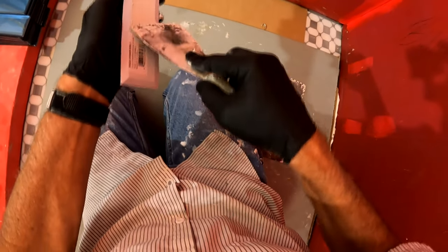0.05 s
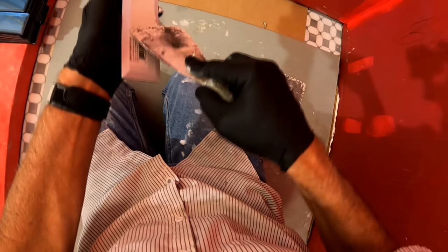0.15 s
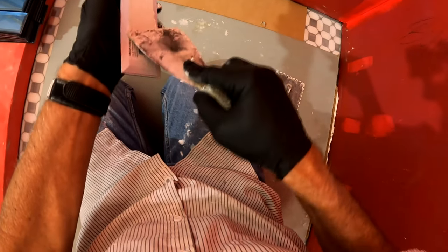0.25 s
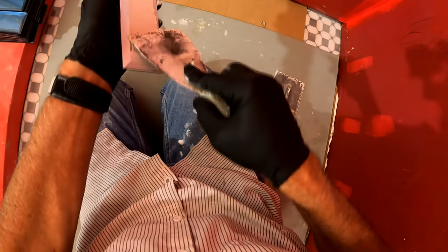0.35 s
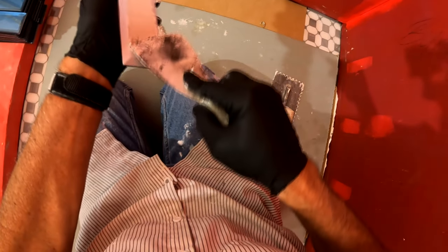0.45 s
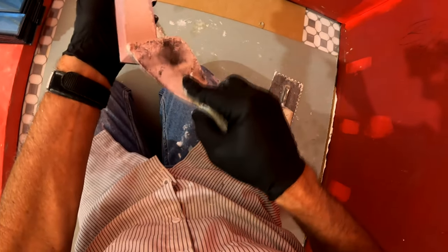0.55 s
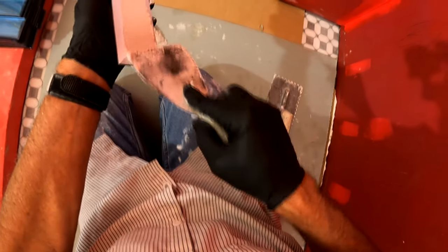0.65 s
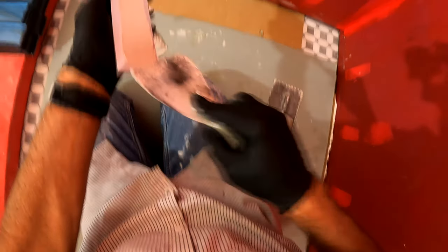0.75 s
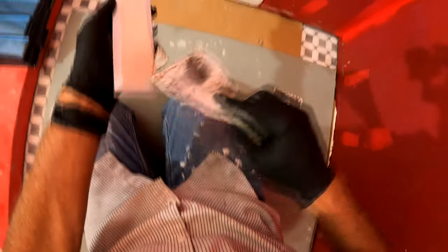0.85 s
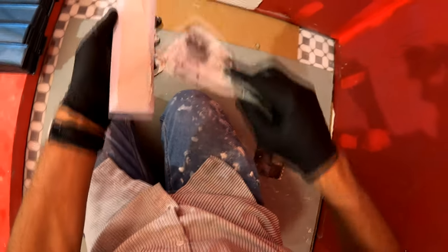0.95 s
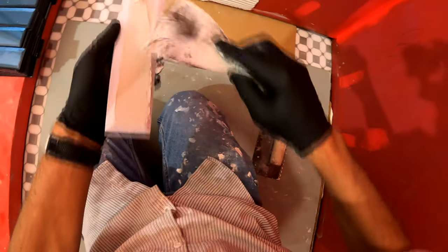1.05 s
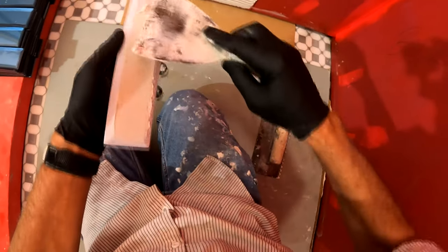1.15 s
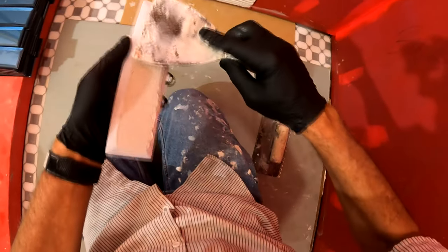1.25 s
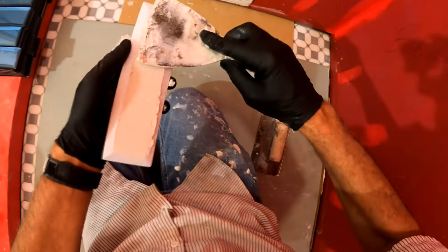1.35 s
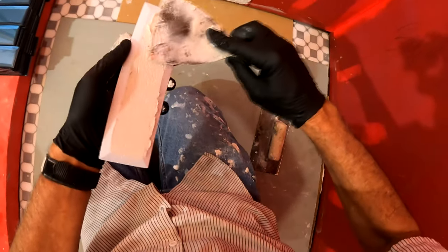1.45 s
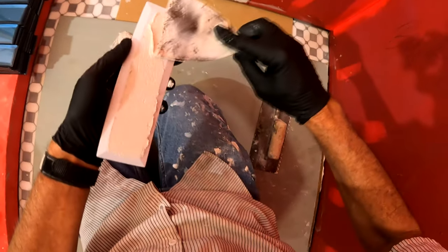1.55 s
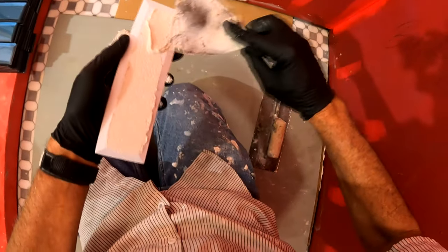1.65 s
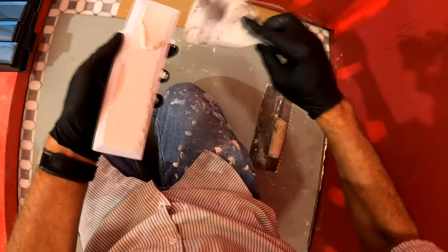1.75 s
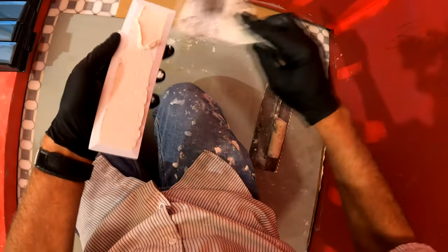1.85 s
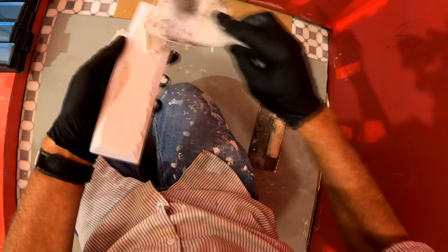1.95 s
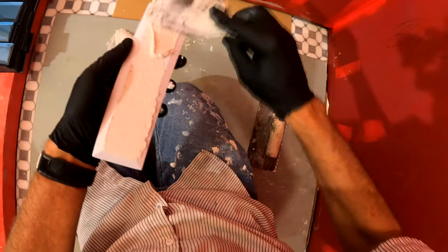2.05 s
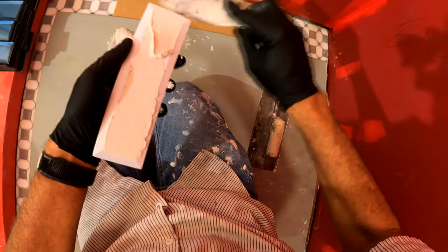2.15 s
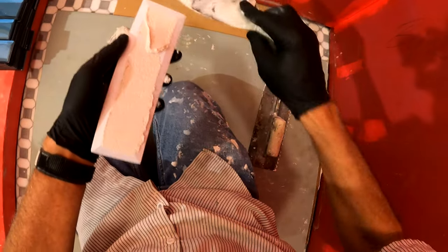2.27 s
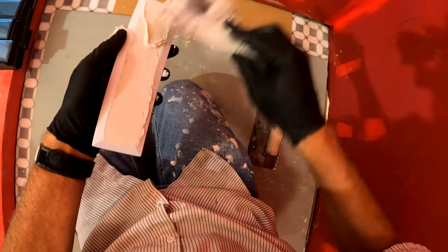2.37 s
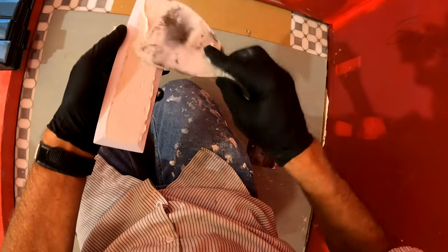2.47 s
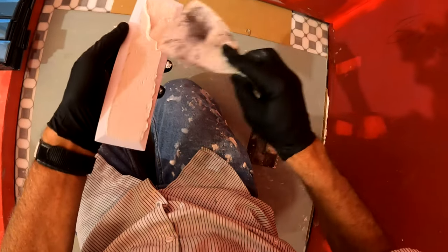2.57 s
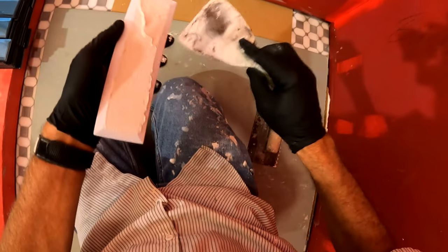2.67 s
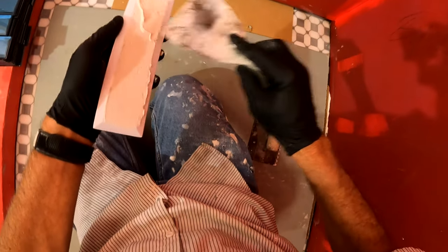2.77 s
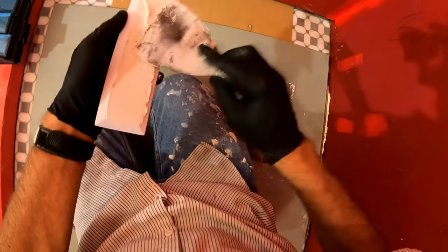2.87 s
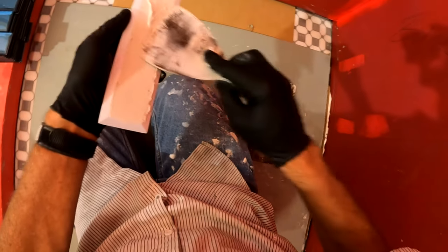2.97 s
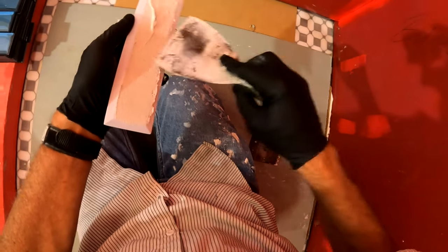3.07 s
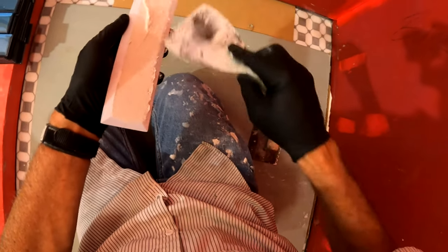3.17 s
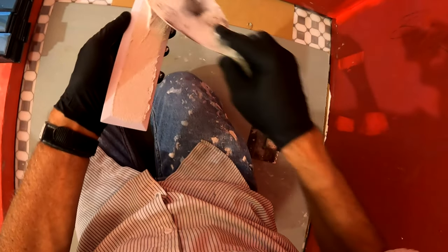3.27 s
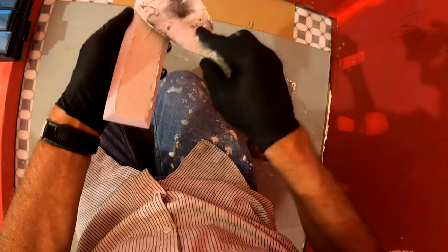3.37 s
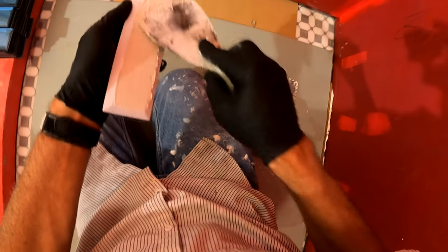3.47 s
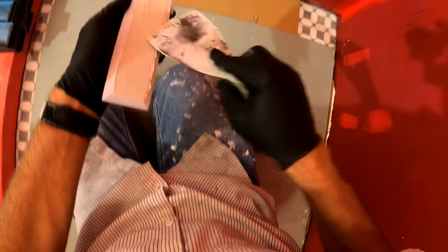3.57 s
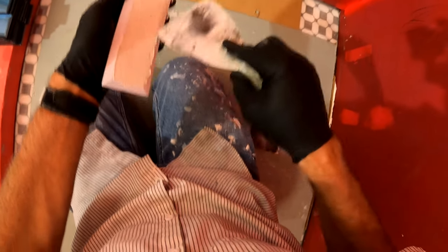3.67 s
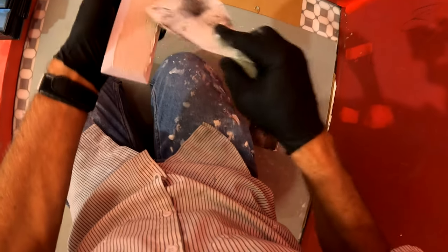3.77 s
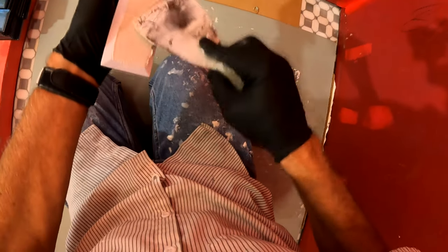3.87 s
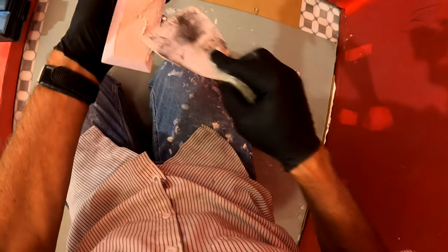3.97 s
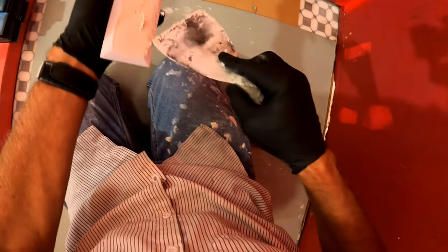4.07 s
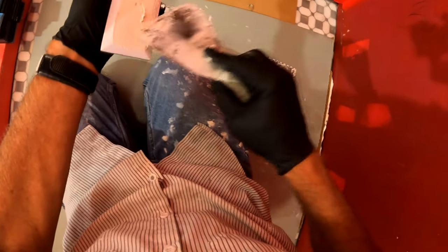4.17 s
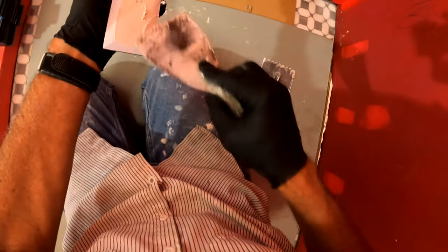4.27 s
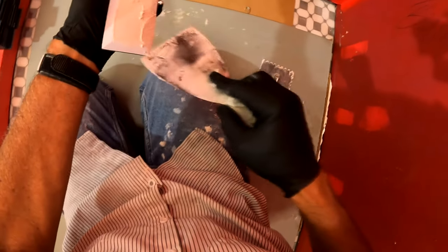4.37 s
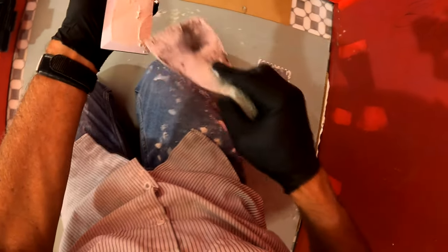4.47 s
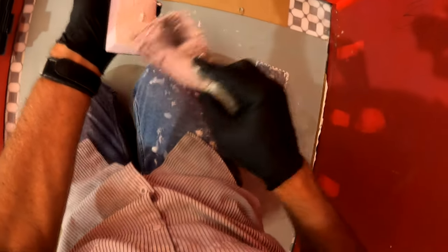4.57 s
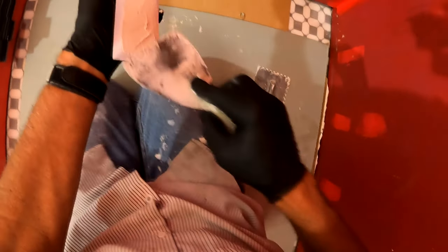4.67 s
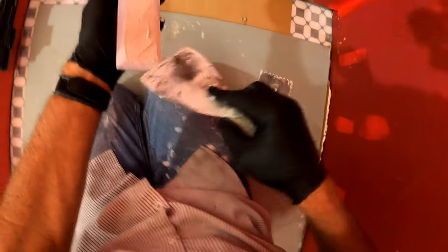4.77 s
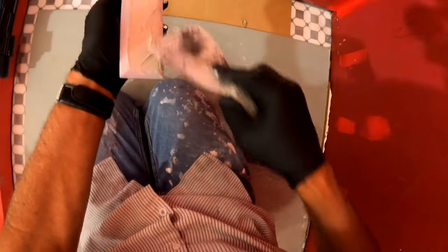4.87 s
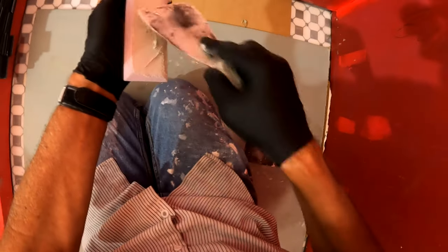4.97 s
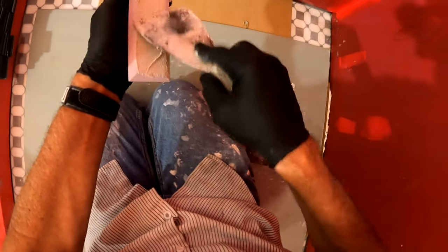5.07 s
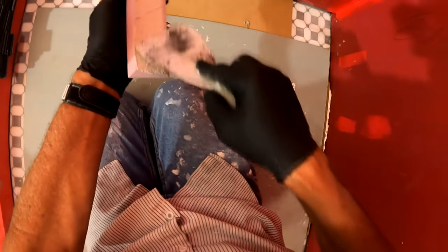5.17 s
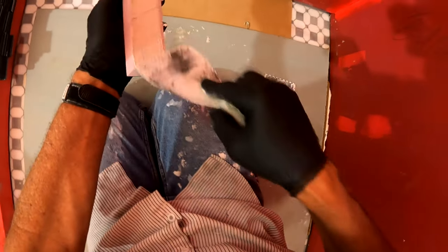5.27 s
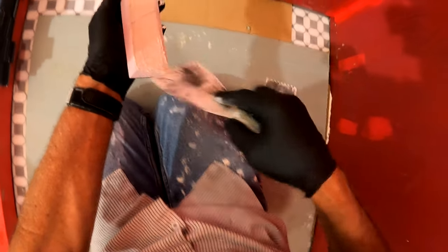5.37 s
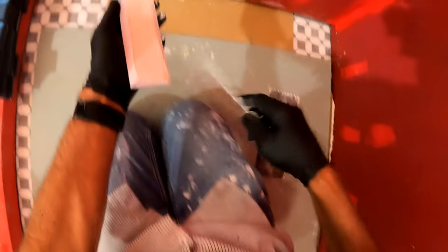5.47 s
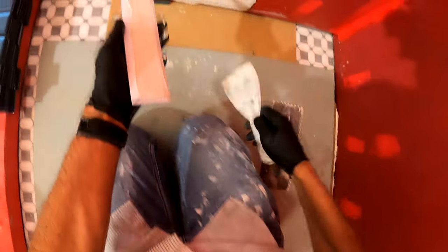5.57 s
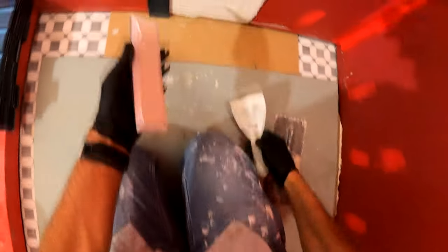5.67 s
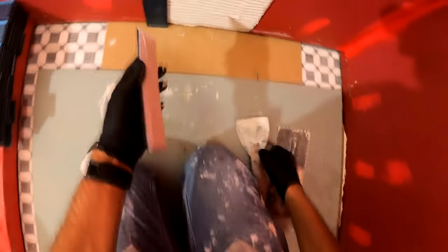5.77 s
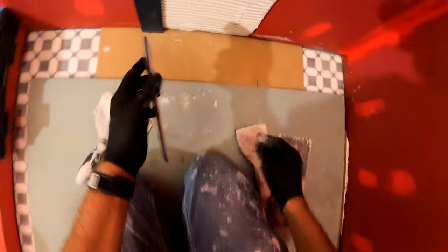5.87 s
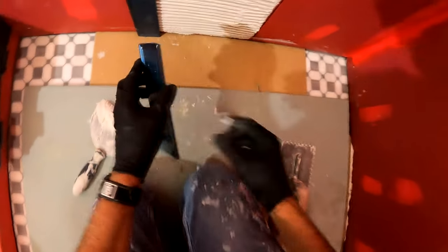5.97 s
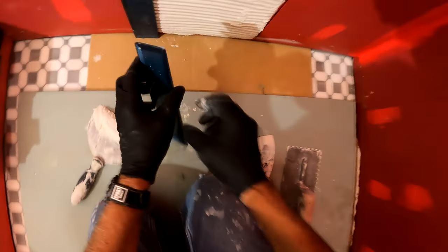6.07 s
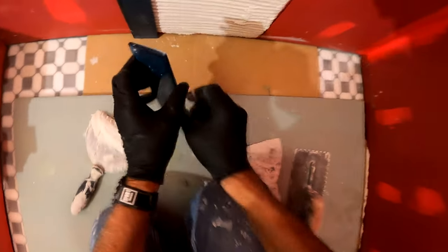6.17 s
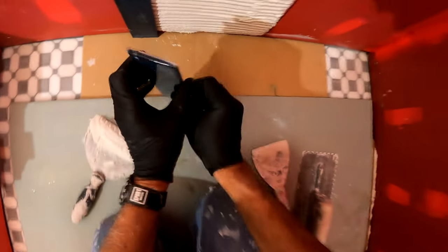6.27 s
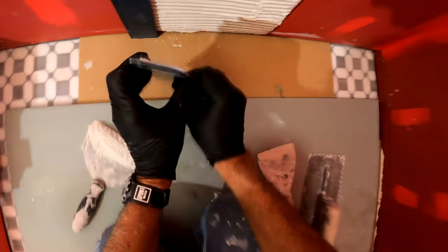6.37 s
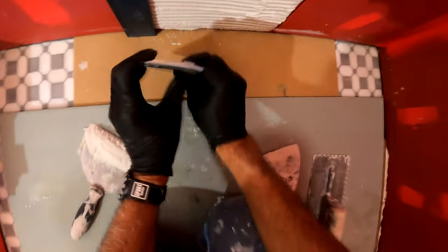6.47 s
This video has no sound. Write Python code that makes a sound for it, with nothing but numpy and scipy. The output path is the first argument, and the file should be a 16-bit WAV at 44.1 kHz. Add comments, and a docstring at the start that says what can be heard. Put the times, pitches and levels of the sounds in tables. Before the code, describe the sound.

A close, dry-gritty perspective inside a small hard-walled shower stall, with short sparse echoes, faint room air and low rumble swelling as the body moves. From 0 to 0.9 s a steel putty knife makes three overlapping crunchy scrapes through sandy mortar, dotted with bright ringing stone clicks. Gloves and sleeves rustle softly around 0.9-1.3 s; a blade tap and dull bump land at 1.35. Short separate scrapes follow at about 1.5, 1.75, 2.2, 2.65 and 3.1, with a firm low tile bump near 2.95. A double tap at 3.43 leads into brief strokes to 3.75, then scrapes at 4.0, 4.3-4.5 and 4.75, another thump at 4.83, and a last grating stroke at 5.1-5.4. Rustling rises at 5.4-5.85. At 5.85 the dropped knife hits with a very loud hard knock, rattling and clinking until 6.05. Faint rustles finish around 6.3-6.55.

```python
"""A steel putty knife works gritty mortar onto the back of a small tile in a hard-walled shower stall.
Quick scrapes open the scene: crunching noise rings the modes of blade and tile, and stones catch the edge.
Then come spaced strokes, blade taps, dull bumps (decaying sines) and rustling gloves and sleeves (shaped noise).
Near the end the dropped knife bounces: floor modes thud and the steel clinks; a few last rustles follow.
Room tone (shaped noise with a swelling rumble) and the stall's sparse echoes lie under it all."""
import sys
import numpy as np
from scipy import signal
from scipy.fft import rfft, irfft, next_fast_len
from scipy.io import wavfile
from scipy.ndimage import uniform_filter1d

SR = 44100
rng = np.random.default_rng(int(sys.argv[2]) if len(sys.argv) > 2 else 0)


def to_wav(sig):
    """Store sig (one row per channel, or 1-D mono) as 16-bit WAV at the path in sys.argv[1].

    Samples outside -1..1 are clipped; the rate is SR.
    """
    pcm = np.clip(np.atleast_2d(sig), -1, 1) * 32767
    pcm = np.round(pcm).astype(np.int16)
    wavfile.write(sys.argv[1], SR, pcm.T)  # frames by channels


N = 287973


def gain_of(db):
    """Amplitude factor of a level in dB."""
    return 10 ** (np.asarray(db) / 20)


def evened(x):
    """Scales x to rms 1."""
    return x / np.sqrt(np.mean(x ** 2) + 1e-20)


def read(points, hz):
    """Reads a curve of (Hz, value) points, straight over log frequency."""
    f, value = np.transpose(points)
    return np.interp(np.log(hz + 1), np.log(f + 1), value)


def shaped(x, gain):
    """Weights each frequency of x by gain(hz)."""
    size = next_fast_len(x.shape[-1])
    spectrum = rfft(x, size) * gain(np.fft.rfftfreq(size, 1 / SR))
    return irfft(spectrum, size)[..., :x.shape[-1]]


def ring(x, hz, width_hz):
    """One fixed mode: a two-pole resonance that rings down after each push."""
    r, w = np.exp(-np.pi * width_hz / SR), 2 * np.pi * hz / SR
    return signal.lfilter([0, np.sin(w)], [1, -2 * r * np.cos(w), r * r], x)


def sweep(x, hz, width_hz):
    """A moving resonance of peak gain 1: x is shifted down by the curve hz, smoothed and shifted back."""
    turn = np.exp(2j * np.pi * np.cumsum(hz * np.ones(len(x))) / SR)
    r = np.exp(-np.pi * width_hz / SR)
    return 2 * (turn * signal.lfilter([1 - r], [1, -r], x / turn)).real


def wander(length, span):
    """Slow random curve of rms 1: noise smoothed twice over span samples."""
    once = uniform_filter1d(rng.standard_normal(length), size=span)
    return evened(uniform_filter1d(once, size=span))


def add(mix, start_s, sound):
    """Adds sound into mix, cut off at the end of mix."""
    part = mix[..., round(start_s * SR):][..., :sound.shape[-1]]
    part += sound[..., :part.shape[-1]]


# Stereo width of stall and air. Each row: frequency in Hz, gain of the opposed part from 0 to 1.
WIDTH_CURVE = [(100, 0.16), (300, 0.18), (600, 0.31), (1200, 0.52), (4000, 0.75), (13000, 0.6)]


def spread(mid, side):
    """Left and right from a shared part and an opposed part."""
    side = shaped(side, lambda hz: np.clip(read(WIDTH_CURVE, hz), 0, 1))
    return np.array([mid + side, mid - side])


RUMBLE_BED_DB = -64
# Body shifts that swell the rumble. Each row: peak time in s, peak gain added to the bed in dB,
# rise of 20 dB in s, fall of 20 dB in s.
BODY_SHIFTS = [(.3, -56, .4, .6), (1.23, -43.5, 0.25, 0.62), (2.18, -51, 0.092, .1),
               (2.54, -54.5, .3, 0.41), (3.01, -50.5, .1, .5), (3.83, -42, 0.14, 0.57),
               (4.9, -40.5, .2, 0.51), (5.88, -49, 0.17, 0.19)]


def swells():
    """Gain of the rumble: a constant bed plus one exponential rise and fall for each shift of the body."""
    t = np.arange(N) / SR
    gain = gain_of(RUMBLE_BED_DB)
    for peak_s, db, rise_s, fall_s in BODY_SHIFTS:
        gain = gain + gain_of(db - 20 * np.maximum((peak_s - t) / rise_s, (t - peak_s) / fall_s))
    return gain


AIR_DB = -53  # rms
# Spectrum of the air. Each row: frequency in Hz, relative level in dB.
AIR_CURVE = [(35, -44), (60, -22), (112, -11.5), (234, -8), (500, -14.5), (560, -24), (855, -27),
             (1080, -25), (1490, -24.5), (2800, -39.5), (5000, -38), (15000, -57)]
# Faint hum bands in the air. Each row: centre in Hz, width of each of two passes in Hz, rms level in dB.
HUM_BANDS = [(338, 37, -62.5), (469.8, 19, -63)]


def room_tone():
    """Steady broad noise, two faint narrow noise bands and a low rumble that follows the body."""
    air = shaped(rng.standard_normal((2, N)), lambda hz: gain_of(read(AIR_CURVE, hz)))
    rumble_curve = [(8, -27), (24, 1.0), (55, -10.5), (100, -14.5), (200, -61.5)]  # (Hz, dB)
    low = shaped(rng.standard_normal((2, N)), lambda hz: gain_of(read(rumble_curve, hz)))
    rumble = evened(low[0]) + 0.15 * evened(low[1]) * np.array([[1], [-1]])
    hum = np.zeros(N)
    for hz, width_hz, db in HUM_BANDS:
        band = sweep(sweep(rng.standard_normal(N), hz, width_hz), hz, width_hz)
        hum += gain_of(db) * evened(band)
    return gain_of(AIR_DB) * evened(spread(*air)) + hum + swells() * rumble


# Decay of the stall. Each row: frequency in Hz, t60 in s.
STALL_T60 = [(180, 0.2), (700, 0.41), (1840, 0.29), (4850, 0.31), (12000, 0.19)]
# Strength of the stall. Each row: frequency in Hz, relative level in dB.
STALL_LEVEL = [(100, -22.5), (500, 4.5), (2000, -3), (6000, -7), (13000, -3.5)]


def stall(x):
    """Close hard walls: sparse echoes of random sign, each band dying at its own speed."""
    echoes = np.zeros((2, SR))
    at = np.arange(100, SR - 20, 20) + rng.integers(0, 20, (2, (SR - 101) // 20))
    np.put_along_axis(echoes, at, rng.choice([-1., 1.], at.shape), 1)
    hz, t, bands = signal.stft(echoes, SR, nperseg=256)
    t60_s = read(STALL_T60, hz)[:, None]
    level_db = read(STALL_LEVEL, hz)[:, None] - 60 * t / t60_s
    bands = bands * gain_of(level_db) / np.sqrt(t60_s * 160)  # long bands start softer
    tail = signal.istft(bands, SR, nperseg=256)[1]
    tail[:, :100] = 0  # nothing returns before the nearest wall
    return spread(*signal.fftconvolve(x[None], tail, axes=1)[:, :N])


# Gloves, sleeves and wet mortar. Each row: start in s, length in s, level before the swell in dB.
RUSTLE_EVENTS = [(0.881, .2, -49.5), (1.076, .14, -51.5), (1.252, 0.13, -61.5), (2.079, 0.067, -56),
                 (2.537, 0.061, -58), (3.27, 0.19, -58.5), (5.381, 0.19, -54), (5.501, 0.14, -43),
                 (5.599, .17, -42.5), (5.757, 0.091, -47), (6.298, 0.094, -60.5), (6.42, .14, -54)]
# Spectrum of rubber and cloth. Each row: frequency in Hz, relative level in dB.
RUSTLE_CURVE = [(180, -41), (300, 0), (703, -15.5), (763, -8), (1080, -12.5), (1910, -7), (3220, -13.5),
                (4470, -8.5), (11700, -24.5), (15000, -41.5)]


def rustles():
    """Soft patchy noise of rubber and cloth; each rustle swells and fades."""
    out = np.zeros(N)
    for start_s, length_s, db in RUSTLE_EVENTS:
        t = np.arange(0, length_s, 1 / SR)
        flicker = evened(uniform_filter1d(rng.standard_normal(len(t)), size=300))
        patchy = rng.standard_normal(len(t)) * gain_of(1.3 * flicker)
        noise = shaped(patchy, lambda hz: gain_of(read(RUSTLE_CURVE, hz)))
        add(out, start_s, evened(noise) * gain_of(db) * np.sin(np.pi * t / length_s) ** 1.2)
    return out


# Tile against hand and knee. Each row: start in s, level before onset and decay in dB, pitch in Hz, t60 in s.
TILE_BUMPS = [(1.348, -30.5, 201, 0.053), (2.092, -44.5, 199, 0.18), (2.556, -31, 161, 0.031),
              (2.962, -21, 168, 0.029), (3.43, -33, 330, 0.09), (3.93, -34, 150, 0.052),
              (4.0, -29, 400, .08), (4.335, -30.5, 410, .06), (4.679, -35.5, 119, 0.055),
              (4.825, -18, 170, 0.034), (4.92, -37, 127, 0.12), (6.075, -33, 125, 0.2)]


def bumps():
    """Soft low knocks: damped sines with a rounded onset."""
    out, t = np.zeros(N), np.arange(12000) / SR
    onset = 1 - np.exp(-(t / 0.00082) ** 2)
    for start_s, db, hz, t60_s in TILE_BUMPS:
        decay = gain_of(db - 60 * t / max(t60_s, .02))
        add(out, start_s, decay * np.sin(2 * np.pi * hz * t) * onset)
    return out


# Bounces of the dropped knife. Each row: start in s, thud level in dB, contact time constant in ms,
# clink level in dB, clink pitch in Hz.
BOUNCES = [(5.843, -8, 0.34, -35.5, 2360), (5.847, 2, 0.18, -31.5, 2420), (5.857, -12, 0.32, -35.5, 3100),
           (5.905, -18, 0.15, -39, 1850), (5.917, -7, 0.29, -27.5, 1900), (5.923, -11.5, 0.19, -25, 3300),
           (5.938, -13, 0.28, -32, 2980), (5.956, -18, 0.3, -28.5, 3100), (5.999, -15.5, 0.43, -37, 1800),
           (6.002, -14, 0.43, -28.5, 3100), (6.032, -18, 0.27, -30.5, 2880)]
# Modes of floor and handle. Each row: frequency in Hz, relative level in dB, t60 in s.
FLOOR = [(90, -25, 0.15), (149, -5.5, 0.098), (227, -7, 0.089), (293, -4, 0.045), (452, -2.5, 0.04),
         (582, 0, 0.05), (770, -4, 0.026), (1070, 6, 0.0068), (1210, 17, 0.0094), (1450, 7.5, 0.034)]


def drop():
    """Each bounce thuds and rattles into the floor and clinks the free steel; long contacts sound deeper."""
    out, t = np.zeros(N), np.arange(8000) / SR
    for start_s, thud_db, contact_ms, clink_db, clink_hz in BOUNCES:
        u = t * 1000 / max(contact_ms, .05)
        rattle = 0.12 * rng.standard_normal(len(t)) * np.exp(-t / 0.0046) * (1 - np.exp(-u))
        blow = -u * np.exp(-u) + rattle
        where_db = 1.9 * rng.standard_normal(len(FLOOR))  # it lands on another corner each time
        thud = np.zeros(len(t))
        for (hz, db, t60_s), corner_db in zip(FLOOR, where_db):
            thud += gain_of(db + corner_db) * ring(blow, hz, np.log(1000) / np.pi / t60_s)
        # keeps the thud free of offset and rumble below 75 Hz
        thud = signal.sosfilt(signal.butter(2, 75, "high", fs=SR, output="sos"), thud)
        puff = rng.standard_normal(len(t)) * (np.exp(-t / 0.003) + .12 * np.exp(-t / .03))
        grit = shaped(puff, lambda f: gain_of(read(GRIT_CURVE, f) - 4.0))
        clink = 0.61 * ring(puff, clink_hz, 650) + grit
        sound = gain_of(thud_db) * thud / abs(thud).max()
        sound += gain_of(clink_db) * clink / clink[:400].std()
        add(out, start_s, sound * np.linspace(1, 0, len(t)) ** 2)
    return out


FLEX = 0.0088  # rms drift of the modes, as a share of their pitch, as the blade bends
# Spectrum of crushed sand. Each row: frequency in Hz, relative level in dB.
GRIT_CURVE = [(88, -58.5), (150, -3), (472, 1.5), (752, -9), (1090, -2.5), (2510, 7.5), (2820, 9.5),
              (4000, 10.5), (5450, 9), (12100, -3.5), (14300, -16), (15600, -41)]
# Modes of blade and tile. Each row: frequency in Hz, width in Hz, base level over the crunch in dB.
BLADE_MODES = [(649, 62, 5.5), (1048, 94, 13), (1508, 78, 5), (2255, 67, 5), (2850, 68, 4), (3520, 72, -6),
               (4560, 59, 6.5), (5560, 160, 6), (7100, 830, 6), (12150, 200, -4)]


def steel(force, low_db, edge_hz, body_hz, favour_db, shift_db, bite_db):
    """Force on the blade: a broad crunch rings its modes; the contact favours one edge and one body pitch."""
    crunch = shaped(force, lambda hz: gain_of(read(GRIT_CURVE, hz)))
    low = signal.sosfilt(signal.butter(2, 2000, fs=SR, output="sos"), crunch)
    crunch = crunch + (gain_of(low_db + 11.0) - 1) * low
    # wet mortar blurs the favoured modes into broad bands
    edge_band = sweep(sweep(crunch, edge_hz, 1300), edge_hz, 1300)
    out = 1.11 * crunch + gain_of(bite_db) * edge_band
    out += 2.54 * sweep(crunch, body_hz, 454)
    for hz, width_hz, db in BLADE_MODES:
        favoured_hz = body_hz if hz < 2000 else edge_hz
        near = np.exp(-(np.log(hz / favoured_hz) / .13) ** 2)
        shift = shift_db * wander(len(force), span=500)  # each stone meets the edge somewhere else
        push = crunch * gain_of(db + favour_db * near + shift)
        out += sweep(push, hz * (1 + FLEX * wander(len(force), span=2500)), width_hz)
    return out


TOUCH_DB, LIFT_DB = -21.5, -14.5  # touch relative to the full level, end relative to the easing level
# Strokes of the blade. Each row: touch, full-level, easing and end times in s (easing may precede full level
# or follow the end), full level in dB, easing level in dB, relative weight of the lows at touch and at the end
# in dB, edge pitch at touch and at the easing time in Hz, body pitch at touch and at the end in Hz,
# bite (gain of the edge band) in dB.
BLADE_STROKES = [(-.05, 0.0, 0.34, 0.441, -36.5, -35.5, -6.5, -10, 2560, 2240, 1200, 1500, 0),
                 (.4, 0.436, 0.71, .78, -36, -41, -6.5, -16, 4740, 4500, 1400, 1500, -1),
                 (.7, 0.77, 0.866, .91, -36.5, -34.5, -17, 8.5, 5300, 4550, 1500, 1100, -3),
                 (1.499, 1.551, 1.64, 1.72, -43.5, -41, -5.5, -9, 4440, 3560, 1180, 1100, -1),
                 (1.66, 1.747, 1.766, 1.85, -26.5, -27, -15, 7, 4700, 4640, 1400, 1010, -6),
                 (2.146, 2.188, 2.17, 2.265, -32.5, -28.5, -7.5, 0, 4500, 2890, 1700, 1070, -3),
                 (2.591, 2.681, 2.656, 2.76, -28, -25.5, -4, 2.5, 4600, 2850, 1590, 1300, -3),
                 (3.019, 3.069, 3.16, 3.22, -30.5, -35.5, -14.5, 3.5, 4180, 4550, 1550, 1050, 0.5),
                 (3.431, 3.457, 3.7, 3.54, -40.5, -34, -7, -11, 5200, 5900, 1470, 1350, 1),
                 (3.52, 3.601, 3.67, 3.74, -31, -33, -14, 0, 3300, 3980, 1470, 1320, 3),
                 (3.94, 3.958, 4.11, 4.135, -33, -31, -14, 5, 5560, 5160, 1460, 1450, 8.5),
                 (4.267, 4.291, 4.46, 4.5, -33.5, -30.5, -15, 3, 5560, 4860, 1530, 675, 10.5),
                 (4.579, 4.61, 4.68, 4.67, -46, -50.5, -2, -1, 4530, 4400, 650, 650, 2),
                 (4.681, 4.753, 4.78, 4.86, -30.5, -31, -14, -0.5, 5550, 4530, 1300, 620, 3),
                 (5.11, 5.175, 5.27, 5.41, -29.5, -28.5, -15, -9, 4330, 2980, 1400, 910, 3)]


def stroke(touch_s, full_s, ease_s, end_s, full_db, ease_db, low_touch_db, low_end_db, edge_touch_hz,
           edge_ease_hz, body_touch_hz, body_end_hz, bite_db,
           stones_per_s=900, spread_db=3.0, hiss=0.39, judder_db=3.0):
    """Sand hisses under the edge while single stones snap; the edge judders as it sticks and slips."""
    t = np.arange(max(touch_s, 0), end_s, 1 / SR)
    along = (t - touch_s) / (end_s - touch_s)
    slid = np.minimum((t - touch_s) / (ease_s - touch_s), 1)  # how far the contact has slid along the edge
    level_db = np.interp(t, [touch_s, full_s, ease_s, end_s],
                         [full_db + TOUCH_DB, full_db, ease_db, ease_db + LIFT_DB])
    low_db = low_touch_db + (low_end_db - low_touch_db) * along
    edge_hz = edge_touch_hz + (edge_ease_hz - edge_touch_hz) * slid ** 2
    body_hz = body_touch_hz + (body_end_hz - body_touch_hz) * along ** 1.27

    size = gain_of(spread_db * np.minimum(rng.exponential(1, len(t)), 2.6))
    size = size * rng.choice([-1., 1.], len(t))
    stones = evened(size * (rng.random(len(t)) < stones_per_s / SR))
    judder = gain_of(judder_db * np.clip(wander(len(t), span=150), -3, 1.6))
    force = (hiss * rng.standard_normal(len(t)) + (1 - hiss) * stones) * judder
    sound = steel(force, low_db, edge_hz, body_hz, favour_db=9.0, shift_db=4.5, bite_db=bite_db)

    running_rms = np.sqrt(uniform_filter1d(sound ** 2, size=2600) + 1e-12)  # the hand keeps its pace
    fade = np.clip(np.minimum((end_s - t) / 0.039, (t - touch_s) / 0.00305), 0, 1)
    return t[0], sound / running_rms * gain_of(level_db) * fade


CATCH_WEIGHT_DB = -9.0  # relative weight of the lows
TAP_BODY_HZ = 1480  # a tap rings mostly the highest body mode, near 1500 Hz
# The blade catches on a stone. Each row: start in s, level in dB, edge pitch in Hz.
STONE_CATCHES = [(0.0116, -15.5, 4400), (0.0788, -14.5, 4350), (0.1367, -19.5, 2650), (0.1435, -17, 4360),
                 (0.2306, -17, 5270), (.2425, -16.5, 4500), (0.2692, -17, 2300), (0.3047, -20.5, 5600),
                 (0.3169, -16.5, 2232), (0.384, -20, 5550), (0.4277, -18, 4380), (0.4925, -13, 4570),
                 (.505, -18.5, 5500), (0.5918, -19.5, 4500), (0.6339, -18, 4420), (.695, -19, 4500),
                 (0.7056, -14, 4370), (0.741, -13.5, 4300), (0.7558, -14.5, 3540), (0.7763, -13.5, 4030),
                 (0.7962, -13.5, 4840), (0.8094, -11, 5540), (1.3675, -18.5, 4530), (1.514, -30, 4550),
                 (1.5726, -22, 2780), (1.655, -19.5, 4200), (2.1789, -16, 2750), (2.21, -13.5, 2890),
                 (2.62, -26, 4570), (2.669, -10, 7130), (3.052, -13.5, 7560), (3.088, -17, 4260),
                 (3.4627, -18, 6940), (3.5433, -16, 6600), (3.5828, -13.5, 5540), (3.5986, -14.5, 3670),
                 (3.613, -13, 3200), (3.954, -16.5, 5580), (3.9698, -12.5, 5540), (4.0, -15.5, 4800),
                 (4.022, -10.5, 5500), (4.317, -13.5, 5400), (4.329, -17, 5500), (4.341, -17.5, 5500),
                 (4.70, -28, 5030), (4.738, -19, 5540), (4.752, -14.5, 5540), (4.79, -16, 4550),
                 (5.1573, -13, 2860), (5.176, -12.5, 4440), (5.202, -14.5, 4400), (5.24, -12.5, 3200),
                 (5.262, -10.5, 2860)]
# The flat of the blade lands on the tile. Each row: start in s, level in dB, edge pitch in Hz,
# relative weight of the lows in dB.
BLADE_TAPS = [(1.3529, -12.5, 4740, -3), (2.152, -23, 4590, 1), (2.9634, -27.5, 5610, -1.5),
              (3.4281, -16.5, 3350, -9.5), (3.4315, -14.5, 2310, -7), (4.274, -29, 5500, -11),
              (5.1124, -27.5, 4560, 1)]


def catch(start_s, db, edge_hz, weight_db, body_hz, burst_s=0.0042):
    """A stone or a tap hits the blade: a click and a short crumble ring the steel."""
    t = np.arange(6000) / SR
    force = 0.27 * rng.standard_normal(len(t)) * np.exp(-t / burst_s) * (1 - np.exp(-t / 0.001))
    force[12] += 1.1  # the click
    sound = steel(force, weight_db, edge_hz, body_hz, favour_db=7.0, shift_db=3.5, bite_db=4)
    return start_s, gain_of(db) * sound / abs(sound).max() * np.linspace(1, 0, len(t))


def scene():
    """Knife slightly off centre, the other sources central, all inside the stall over the room tone."""
    knife = np.zeros(N)
    for row in BLADE_STROKES:
        add(knife, *stroke(*row))
    for row in STONE_CATCHES:
        body_hz = rng.uniform(950, 2000)  # each stone favours another body pitch
        add(knife, *catch(*row, CATCH_WEIGHT_DB, body_hz))
    for row in BLADE_TAPS:
        add(knife, *catch(*row, TAP_BODY_HZ, burst_s=0.0041))
    centre = drop() + bumps() + rustles()
    # the knife reaches the left 16 microseconds later and slightly louder
    late = shaped(knife, lambda hz: np.exp(-2j * np.pi * hz * 16e-6))
    direct = np.array([gain_of(2.5) * late, gain_of(1.8) * knife]) + centre
    return direct + stall(knife + centre) + room_tone()


BAND_LIMIT_HZ = 15650


def record(dry):
    """Rounds off loud peaks, then removes everything above the band limit."""
    rounded = 1.2 * np.tanh(dry / 1.2)
    lowpass = signal.firwin(511, BAND_LIMIT_HZ, window=("kaiser", 9), fs=SR)
    return signal.oaconvolve(rounded, lowpass[None], "same")


dry = scene()
out = record(dry)
to_wav(out)
```